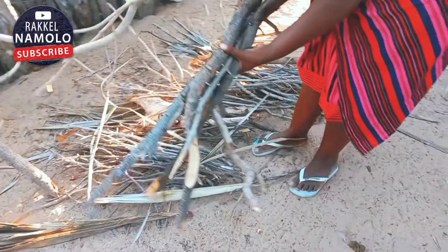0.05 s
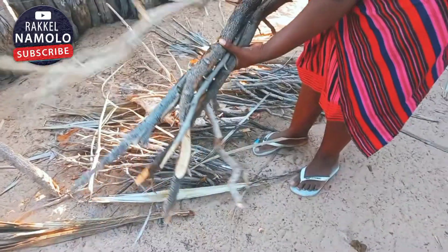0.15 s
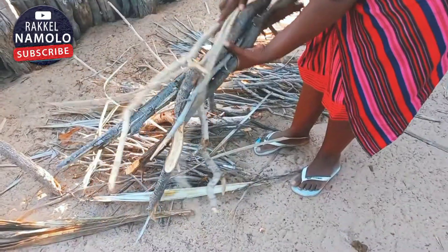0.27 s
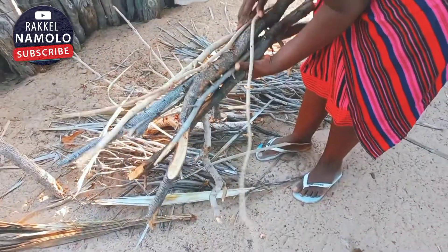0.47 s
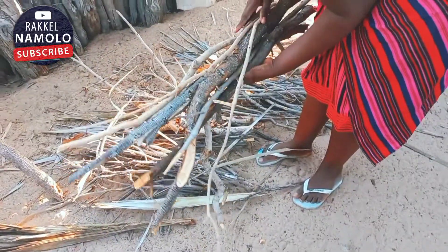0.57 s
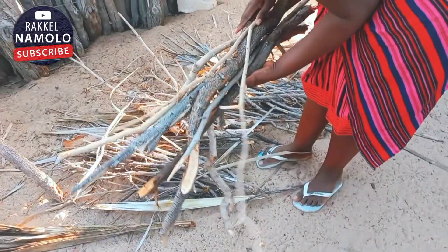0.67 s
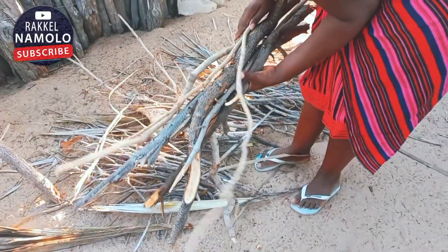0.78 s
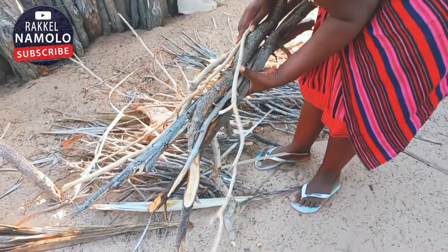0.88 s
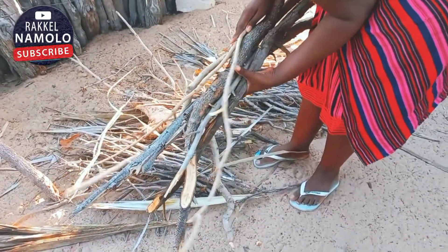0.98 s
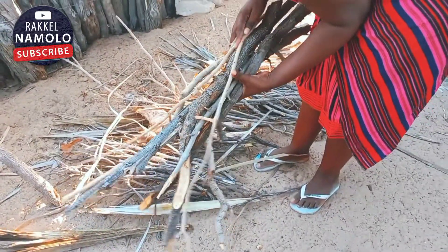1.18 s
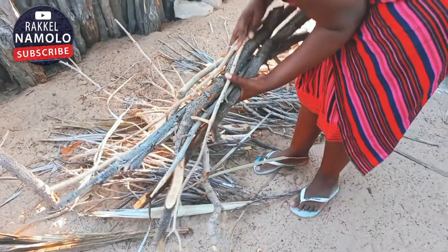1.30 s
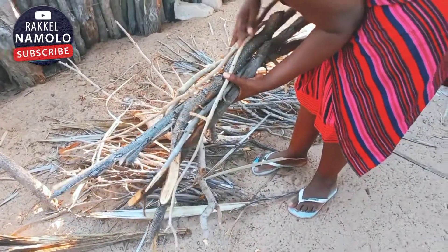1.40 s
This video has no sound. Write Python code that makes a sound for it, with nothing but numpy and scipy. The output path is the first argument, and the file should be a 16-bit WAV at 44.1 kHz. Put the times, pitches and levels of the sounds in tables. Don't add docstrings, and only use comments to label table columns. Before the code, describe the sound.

Dry sticks clack and rattle in a quick burst as they are lifted from a pile in a sandy yard, then low wind puffs thump on a nearby phone microphone over faint twig ticks and rustle.

```python
import sys
import numpy as np
from scipy import signal
from scipy.fft import rfft, irfft
from scipy.io import wavfile
from scipy.ndimage import uniform_filter1d

SR = 44100
rng = np.random.default_rng(int(sys.argv[2]) if len(sys.argv) > 2 else 0)


def how_loud(loudness_db):
    steps = np.asarray(loudness_db, float) / 20
    return 10 ** steps


def master(y):
    cut = np.clip(np.atleast_2d(y).T, -1, 1)
    pcm = np.round(cut * 32767)
    wavfile.write(sys.argv[1], SR, pcm.astype(np.int16))


N = 63945

# (frequency [Hz], gain [dB])
WOOD_RESPONSE = [(380, -2.5), (800, -9), (1100, -7.5), (1600, -8), (2500, -6), (5500, -3.5), (7600, -19.5),
                 (13500, -17.5)]
PORT_LAG_S, PORT_SHARED_POWER = 0.00008, 0.67
TREBLE_PAN_DB = 10.5


def noise(*shape):
    return rng.standard_normal(shape)


def unit(x):
    return x / np.sqrt(np.mean(x ** 2))


def colour(x, points):
    hz, db = np.array(points, float).T
    bin_hz = np.arange(1025) * SR / 2048
    log_gain = np.interp(np.log(bin_hz + 1), np.log(hz), db) * np.log(10) / 20
    cepstrum = irfft(log_gain)
    cepstrum[1:1024] *= 2
    cepstrum[1025:] = 0
    impulse = irfft(np.exp(rfft(cepstrum)))[None, :1024]
    return signal.fftconvolve(x, impulse)[:, :x.shape[1]]


def band(x, lo_hz, hi_hz):
    return signal.sosfilt(signal.butter(2, [lo_hz, hi_hz], "band", fs=SR, output="sos"), x)


def ports(count):
    source = noise(count + 64)
    lag = int(PORT_LAG_S * SR * rng.uniform(0, 2.4))
    shared = np.array([source[lag:lag + count], source[:count]])
    return np.sqrt(PORT_SHARED_POWER) * shared + np.sqrt(1 - PORT_SHARED_POWER) * noise(2, count)


def walk(rate_hz):
    k = int(SR / rate_hz)
    return unit(uniform_filter1d(uniform_filter1d(noise(N), k), k))


def port_wind(eddies, shared):
    phase_rad, widen = 1, 0.67
    swirl_db, swirl_hz = -15, 252
    wake_db, wake_s, breeze_db = -6.5, 0.044, -66.5
    t = np.arange(N) / SR
    thump, gust = np.zeros(N), np.zeros(N)
    for s, db, hz, width_s in eddies:
        puff = how_loud(db) * np.exp(-.5 * ((t - s) / (width_s * widen / 2)) ** 2)
        thump += puff * np.cos(2 * np.pi * hz * (t - s) + phase_rad)
        gust += puff
    swirl = unit(band(band(noise(N) + 2 * shared, 93, swirl_hz), 45, 2 * swirl_hz))
    wake = uniform_filter1d(gust, int(wake_s * SR)) * how_loud(wake_db)
    rumble = unit(band(band(noise(N), 37.8, 126.8), 49, 293))
    return thump + how_loud(swirl_db) * gust * swirl + rumble * (wake + how_loud(breeze_db))


def wind():
    # (time [s], peak level [dB], frequency [Hz], width [s])
    left_eddies = [(0.06, -58, 89, 0.023), (0.129, -48.5, 91, 0.0083), (0.167, -83, 111, 0.0083),
                   (0.245, -77, 124, 0.008), (0.279, -63, 286, 0.0095), (0.332, -32, 101, 0.009),
                   (0.388, -40.5, 117, 0.0062), (0.498, -35, 79.3, 0.065), (0.56, -16, 107, 0.0049),
                   (0.618, -28, 96.5, 0.016), (0.657, -43, 104, 0.0022), (0.769, -24.5, 128, 0.017),
                   (0.841, -47, 257, 0.015), (0.866, -37, 129, 0.027), (0.889, -35.5, 181, 0.013),
                   (0.921, -42.5, 133, 0.048), (0.977, -39.5, 99.6, 0.039), (1.011, -68, 100, 0.0057),
                   (1.046, -36, 82, 0.026), (1.096, -38, 114, 0.017), (1.172, -50, 95, 0.02),
                   (1.207, -47.5, 75.4, 0.013), (1.295, -57, 120, 0.033), (1.359, -80, 99, 0.0081)]
    right_eddies = [(0.126, -49.5, 109, 0.0097), (0.309, -49, 161, 0.0034), (0.331, -35.5, 113, 0.014),
                    (0.379, -46, 98.9, 0.15), (0.471, -31.5, 102, 0.022), (0.527, -34, 155, 0.024),
                    (0.559, -25, 123, 0.028), (0.591, -29, 129, 0.0054), (0.616, -27.5, 91.4, 0.021),
                    (0.68, -46.5, 100, 0.013), (0.701, -46.5, 92, 0.0056), (0.767, -25, 119, 0.012),
                    (0.813, -35, 119, 0.031), (0.861, -30.5, 109, 0.021), (0.922, -33.5, 152, 0.0034),
                    (0.978, -27.5, 137, 0.0082), (1.008, -46, 96, 0.02), (1.049, -34.5, 92, 0.018),
                    (1.082, -41.5, 115, 0.031), (1.161, -39.5, 101, 0.017), (1.229, -46, 96, 0.009),
                    (1.295, -45, 96, 0.026), (1.342, -50.5, 106, 0.045), (1.388, -45.5, 134, 0.0082)]
    more_left = [
        (0.476, -39, 101, 0.033),
        (0.516, -25.5, 203, 0.0079),
        (0.582, -26, 157, 0.0034),
        (0.75, -36, 90, 0.0037),
        (0.79, -41.5, 180, 0.033),
        (1.072, -41, 110, 0.015),
        (1.445, -43.5, 88, .015),
    ]
    more_right = [
        (0.047, -58, 87.5, 0.11),
        (0.452, -35.5, 106, 0.027),
        (0.497, -33, 88, 0.078),
        (0.746, -32.5, 104, 0.011),
        (0.786, -44, 129, 0.016),
        (.84, -37, 166, 0.016),
        (0.887, -37.5, 204, 0.021),
        (1.445, -38.5, 98, 0.0058),
    ]
    shared = noise(N)
    return np.array([port_wind(left_eddies + more_left, shared),
                     port_wind(right_eddies + more_right, shared)])


def rustle():
    # (time [s], level [dB], brightness [dB], weight of the drag [dB])
    handling = [(0, -62, 1, 7.5), (0.085, -70.5, 4.5, 0), (0.148, -62.5, 5.5, 7), (0.214, -73, 8.5, 6),
                (0.219, -100, 36, 10), (0.249, -48.5, -9.5, -3.5), (.31, -45, -1, 5), (0.338, -60.5, -2, 4),
                (0.356, -46, -2, 0.5), (.415, -58, 2, 8), (.46, -57.5, 1.5, 1.5), (.65, -65, 5.5, -5.5),
                (0.752, -74.5, 5, -6.5), (.84, -64, -2, 4.5), (0.959, -77, 10, 8), (1.02, -59.5, 0, -5),
                (1.099, -64, 4, -7.5), (1.124, -74, 6, 7), (1.155, -63, 8, -8), (1.181, -71.5, 0.5, -2),
                (1.229, -64, 4.5, -1.5), (1.295, -73.5, 1, 1.5), (1.45, -67.5, 3.5, 0)]
    grains_per_s, grain_s, hiss_share = 1700, 0.0043, 0.53
    grain_spread_db, grain_top_db, flicker_db = 0.5, 10, 2.8
    s, level_db, bright_db, drag_db = np.array(handling, float).T
    t = np.arange(N) / SR

    grain_db = np.minimum(grain_spread_db * rng.exponential(size=N), grain_top_db)
    grains = (rng.random(N) < grains_per_s / SR) * how_loud(grain_db)
    gate = signal.lfilter([1], [1, -np.exp(-1 / (grain_s * SR))], grains)
    rub = unit(colour(ports(N) * (hiss_share + unit(gate)), WOOD_RESPONSE))

    edges_hz = [200, 680, 1900, 4000, 5800, 7800, 11500, 18000]
    parts = []
    for k, (lo_hz, hi_hz) in enumerate(zip(edges_hz[:-1], edges_hz[1:])):
        parts.append((-1) ** k * band(rub, lo_hz, hi_hz) * how_loud(flicker_db * walk(30)))
    drag = how_loud(np.interp(t, s, drag_db)) * sum(parts[:2])
    pan_db = np.array([[.5], [-.5]]) * TREBLE_PAN_DB
    bright = how_loud(pan_db + np.interp(t, s, bright_db)) * sum(parts[4:])
    return (drag + sum(parts[2:4]) + bright) * how_loud(np.interp(t, s, level_db))


def strike(hz, treble_db, length, ring_db, spread, clean_db):
    ring_t60_s, rise_s = 0.039, 0.002
    hum_db, hum_t60_s = -17, 0.11
    crack_db, crack_t60_s = -8, 0.0059
    tail_db, tail_t60_s = -17, 0.11
    snap_db, snap_t60_s, rattle_db = -4.5, 0.033, 5
    t = np.arange(SR // 5) / SR
    port_t = t - np.array([[0], [PORT_LAG_S]])

    def fade(t60_s):
        rise = np.minimum(t / (rise_s * np.sqrt(length)), 1)
        return how_loud(-60 * t / (t60_s * length)) * rise

    order = np.arange(-2, 3)
    offsets = order + rng.uniform(-.3, .3, 5) * np.sign(order)
    modes_hz = hz * (1 + spread * offsets)
    ring = np.zeros((2, len(t)))
    for k, mode_hz in zip(order, modes_hz):
        ring += how_loud(-8 * abs(k)) * np.sin(2 * np.pi * mode_hz * port_t + .4 * noise(2, 1))

    hum = unit(band(ports(len(t)), modes_hz[1], min(modes_hz[3], 7400)))
    rattle = how_loud(rattle_db * unit(band(noise(len(t)), 42, 340)))
    wood = unit(band(colour(ports(len(t)), WOOD_RESPONSE), 750, 19000))
    snap = unit(band(ports(len(t)), 9500, 17000)) * how_loud(np.array([[.25], [-.25]]) * TREBLE_PAN_DB)

    hit = how_loud(ring_db) * (how_loud(clean_db) * ring + hum) * fade(ring_t60_s)
    hit += how_loud(hum_db) * rattle * hum * fade(hum_t60_s)
    hit += how_loud(crack_db) * wood * fade(crack_t60_s)
    hit += how_loud(tail_db) * wood * rattle * fade(tail_t60_s)
    hit += how_loud(treble_db + snap_db) * snap * fade(snap_t60_s)
    return hit


def strikes(events, ring_db, spread, clean_db):
    out = np.zeros((2, N + SR))
    for s, db, hz, treble_db, length in events:
        hit = strike(hz, treble_db, length, ring_db, spread, clean_db)
        start = int(s * SR)
        out[:, start:start + hit.shape[1]] += how_loud(db) * hit
    return out[:, :N]


def twig_ticks():
    # (time [s], peak level [dB], ring [Hz], treble [dB], length [1 = usual])
    tick_events = [(.506, -64, 1760, 16, 0.31), (.628, -50, 5350, 4, 0.39), (.7771, -61, 5370, 3, 3.4),
                   (.829, -49.5, 1638, -8, 0.73), (.834, -50.5, 1670, -14, 1.2),
                   (.8345, -56.5, 5200, -25, 1.8), (.841, -60, 1950, -28, 1.2), (.849, -67, 5000, -22, .5),
                   (.874, -60, 4900, -23, 0.92), (.9887, -57.5, 6440, -4, 1.5),
                   (1.016, -69, 4800, -28, 1.4), (1.1405, -64, 3470, -10, 2.4),
                   (1.273, -66, 6500, 18.5, 0.2), (1.3122, -48, 4370, 1, 0.39),
                   (1.3126, -50, 3160, -27, 0.36), (1.314, -58, 2270, -29, 0.81),
                   (1.325, -57, 3480, -1, 1.14), (1.4004, -51, 5000, -22, 0.18),
                   (1.4351, -48.5, 6500, 4, .3), (1.447, -53.5, 4530, -8, 0.43)]
    return strikes(tick_events, ring_db=-3.5, spread=.13, clean_db=3)


def stick_knocks():
    # (time [s], peak level [dB], ring [Hz], treble [dB], length [1 = usual])
    knock_events = [(.2256, -23.5, 4893, -9, 0.63), (.2256, -28.5, 3618, -19, 0.72),
                    (.2258, -47, 1005, -21, .8), (.226, -37.5, 2670, -23, 1.08),
                    (.2258, -31.5, 5200, -1, 0.82), (.239, -46, 4080, -25, 0.7),
                    (.257, -47, 5100, -25, 0.67), (.2665, -28.5, 3490, -28, 0.56),
                    (.271, -40, 2610, -28, 1.9), (.2842, -25.5, 3790, -33, 0.52),
                    (.2875, -36, 2227, -35, 1.1), (.292, -34.5, 5000, -35, 1),
                    (.2988, -22.5, 5300, -30, 0.29), (.3005, -50.5, 2360, -30, 1.4),
                    (.304, -41, 5140, -25, 1.1), (.3085, -40.5, 1190, -10, 0.3),
                    (.311, -52, 4760, -9, 0.92), (.318, -57, 5600, -22, 0.56), (.3435, -35.5, 5870, 0, .45),
                    (.351, -43.5, 5400, -9, 1.3), (.3605, -31.5, 3190, -15, 0.41),
                    (.361, -43, 2350, -23, 0.7), (.361, -49, 5450, -25, 0.67), (.3655, -47, 5300, -25, 1),
                    (.369, -43, 3800, -19, 1.7), (.379, -34.5, 2475, -20, 0.28),
                    (.382, -36, 3270, -23, 0.43), (.3845, -38.5, 2464, -25, 0.88),
                    (.389, -47, 1090, -42, 2.9), (.4226, -37.5, 4370, 0, 0.38),
                    (.4228, -40, 5140, -18, 0.49), (.4405, -35.5, 2424, -26, 0.91),
                    (.4405, -40, 3820, -6, 0.9), (.444, -49.5, 1100, -28, 1.4),
                    (.4655, -46.5, 4100, -30, 0.73), (.495, -58, 3110, -36, 2.2),
                    (.5222, -48.5, 1700, 4, 0.78), (.132, -61, 1020, -32, 4.7),
                    (1.055, -70.5, 1299, -12, 20.4), (1.21, -65.5, 567, -12, 3.6)]
    return strikes(knock_events, ring_db=-12, spread=.06, clean_db=12)


def scene():
    return wind() + rustle() + twig_ticks() + stick_knocks()


def low_pass(x):
    return signal.sosfilt(signal.butter(12, 16740, fs=SR, output="sos"), x)


def record(dry):
    top_cut = signal.ellip(8, .2, 28, 15800, fs=SR, output="sos")
    return low_pass(signal.sosfilt(top_cut, dry))


dry = scene()
out = record(dry)
master(out)
```